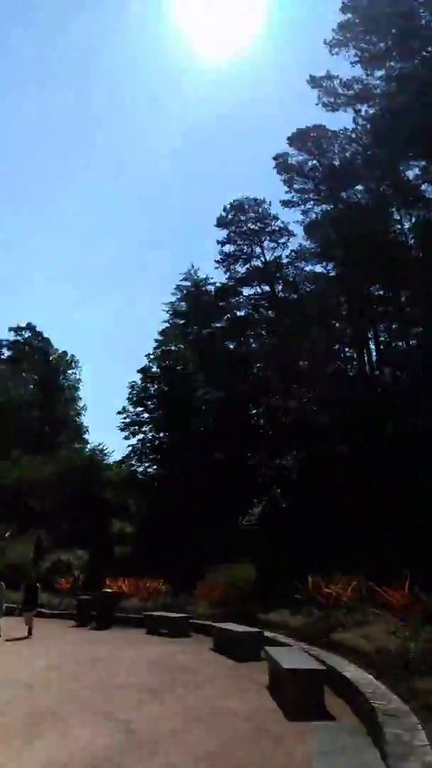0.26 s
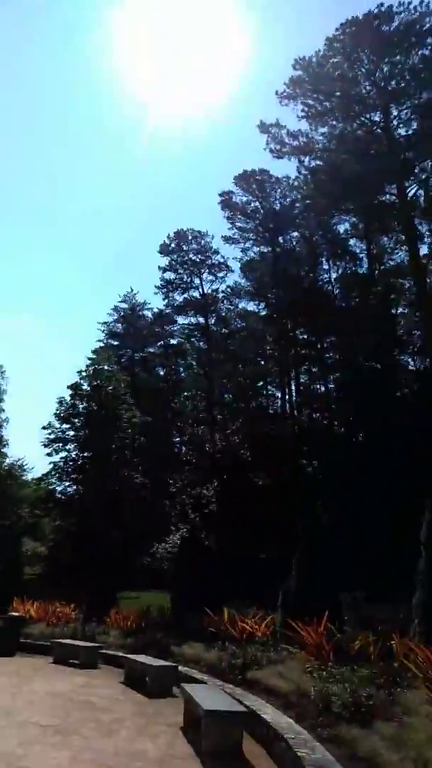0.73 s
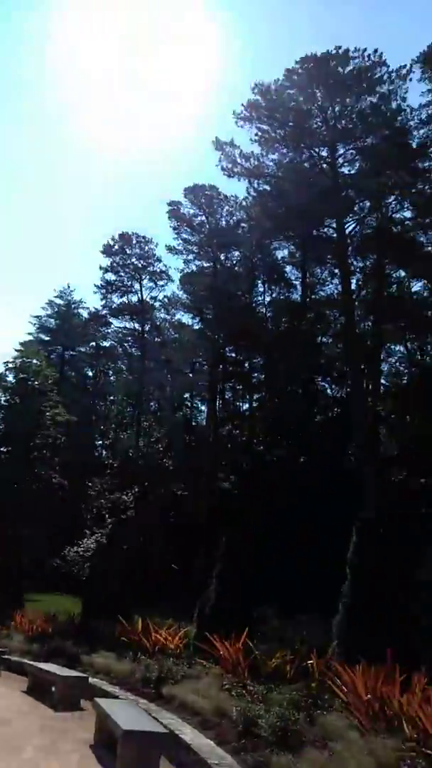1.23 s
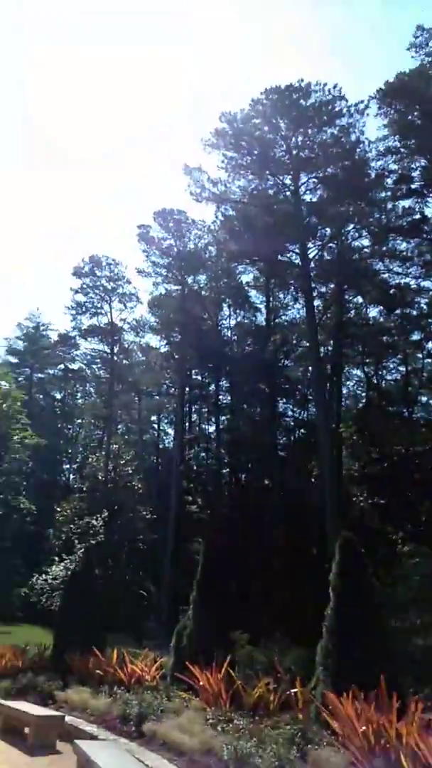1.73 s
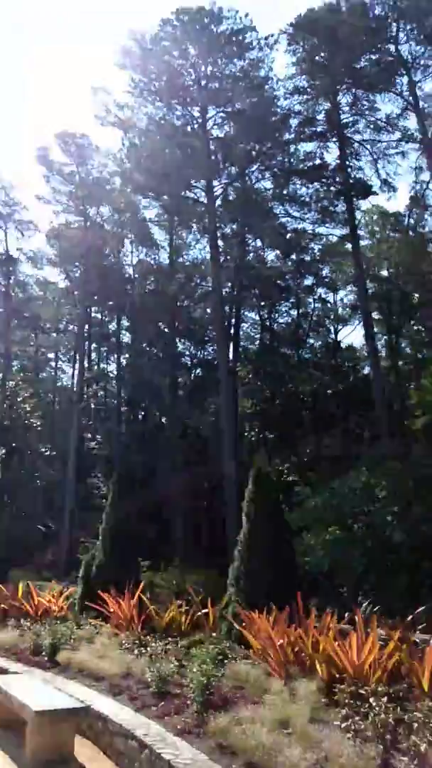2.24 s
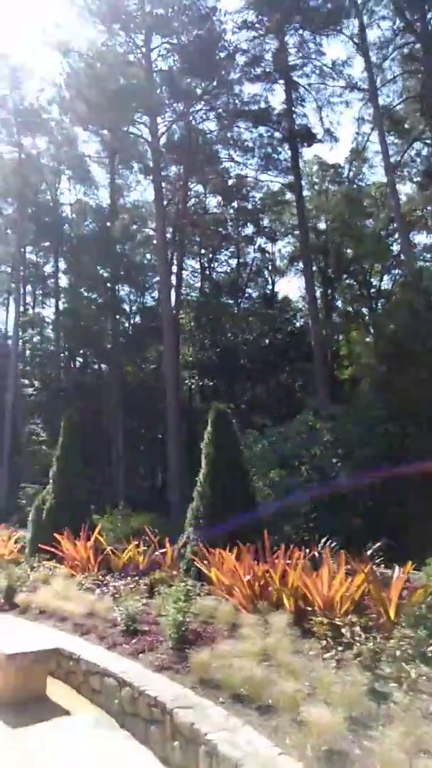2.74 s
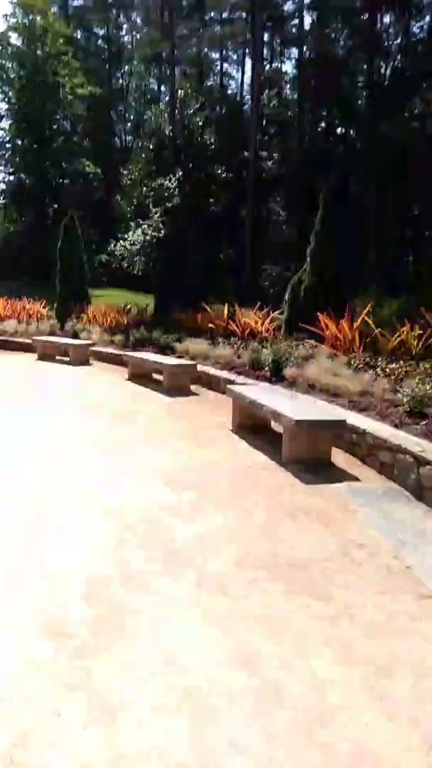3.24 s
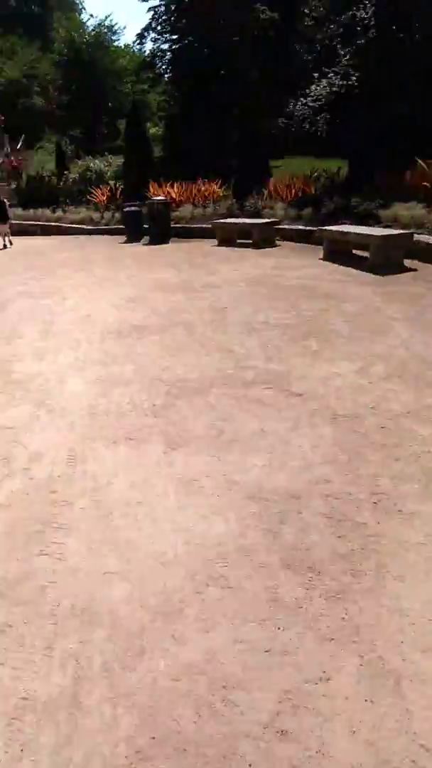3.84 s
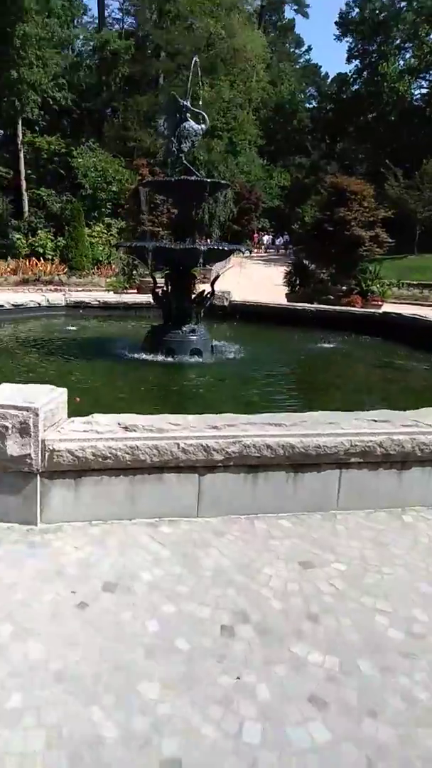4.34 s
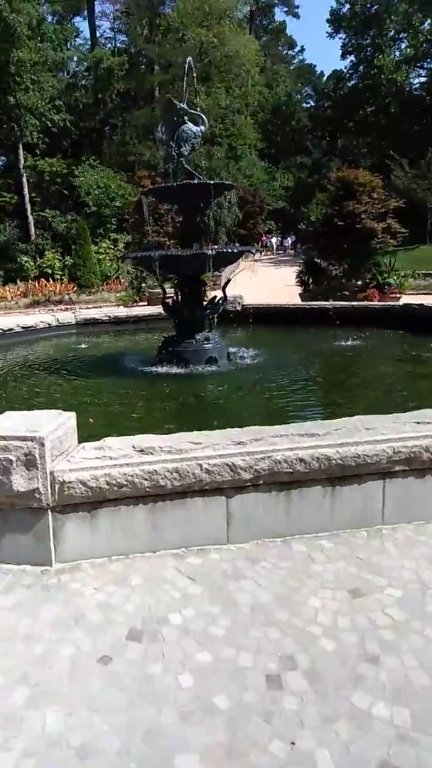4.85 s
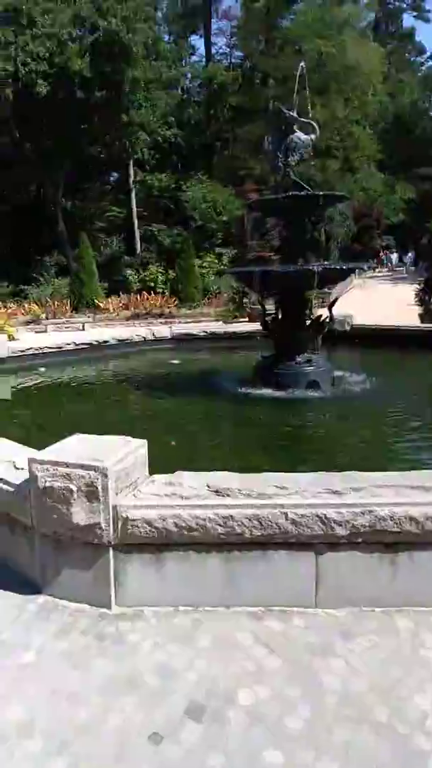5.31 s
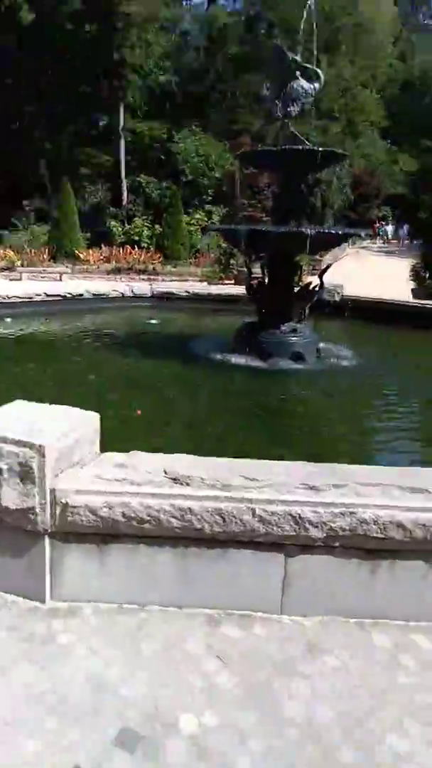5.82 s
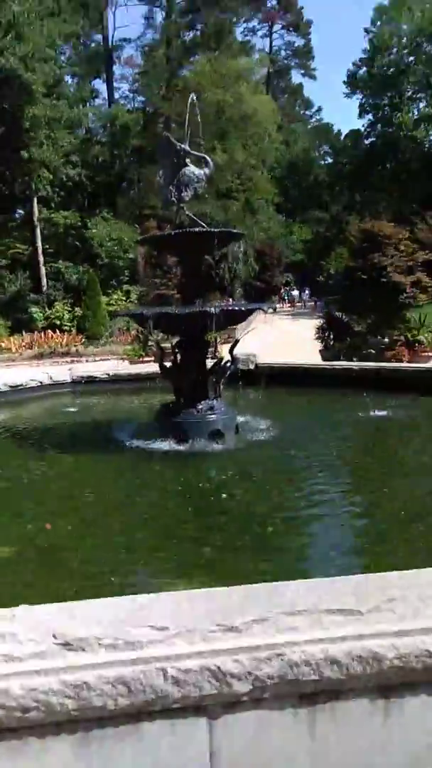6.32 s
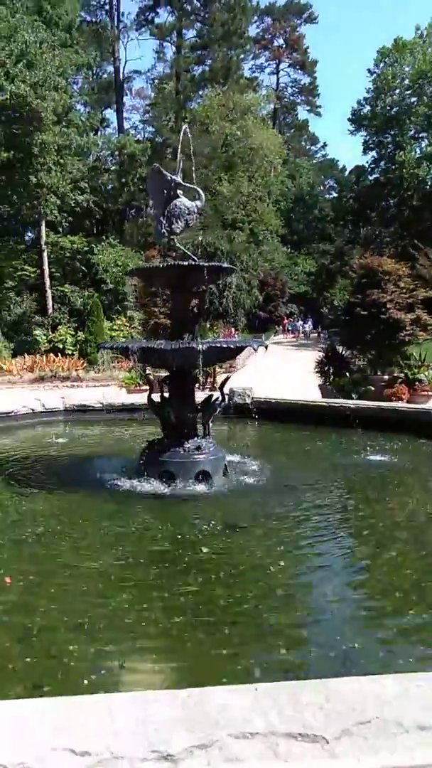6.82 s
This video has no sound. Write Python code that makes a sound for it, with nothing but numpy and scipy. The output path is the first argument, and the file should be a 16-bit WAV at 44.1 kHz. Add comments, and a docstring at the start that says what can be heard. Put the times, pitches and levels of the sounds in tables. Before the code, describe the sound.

Footsteps crunch along a gritty garden path, then a fountain splashes steadily into its pool, with one sharp click close by.

```python
"""Footsteps grind along a gritty garden path, over a soft hiss of leaves and water and a far rumble.
Short hollow knocks and plops pass left and right, and a faint whistle rasps on the right.
The walker then stands by a tiered fountain: sheets of water fizz, spray and bubble in its pool.
All is heard through the two microphone ports of a carried phone. The grit rings the left port
near 9 kHz, and late on a finger strikes the case beside that port."""
import sys
import numpy as np
from scipy import signal
from scipy.fft import rfft, irfft, next_fast_len
from scipy.io import wavfile
from scipy.ndimage import uniform_filter1d

SR = 44100
rng = np.random.default_rng(int(sys.argv[2]) if len(sys.argv) > 2 else 0)


def store_wav(level_fs):
    """Save 16-bit WAV to argv[1]."""
    pcm = np.round(np.clip(np.atleast_2d(level_fs), -1, 1) * 32767)
    wavfile.write(sys.argv[1], SR, pcm.T.astype(np.int16))


N = 311787
T = np.arange(N) / SR
FFT_SIZE = next_fast_len(N, True)
BIN_HZ = np.arange(FFT_SIZE // 2 + 1) * SR / FFT_SIZE
SIDES = np.array([[.5], [-.5]])  # splits a pan_db, always left minus right, between the ports


def undb(db):
    """Decibels to gain."""
    return 10 ** (np.asarray(db) / 20)


def along(curve, hz):
    """Read a (freq_hz, value) curve on a log-frequency axis."""
    return np.interp(np.log(hz + 1), np.log(np.array(curve)[:, 0]), np.array(curve)[:, 1])


def butter(sound, hz, kind, order=2):
    """Butterworth filter."""
    return signal.sosfilt(signal.butter(order, hz, kind, fs=SR, output="sos"), sound)


def add(out, start_s, sound, gains):
    """Mix a sound into both ports."""
    i = int(start_s * SR)
    sound = sound[:N - i]
    out[:, i:i + len(sound)] += np.reshape(gains, (2, 1)) * sound


def waver(rate_hz):
    """Smooth random drift with a spread near 1."""
    hold = int(SR / rate_hz)
    levels = np.repeat(rng.standard_normal(N // hold + 1), hold)
    return 1.3 * uniform_filter1d(uniform_filter1d(levels, hold), hold)[:N]


def swells(lifts):
    """Gain curve of bell-shaped lifts."""
    t = T[::64]
    lift_db = sum(db * np.exp(-((t - peak_s) / width_s) ** 2) for peak_s, db, width_s in lifts)
    return undb(np.interp(T, t, lift_db))


def grains(per_s, scatter_db, tail_s, bed):
    """Envelope of random particles with short tails over a steady bed."""
    hits = (rng.random(N) < per_s / SR) * 1.
    hits *= undb(scatter_db * np.minimum(rng.exponential(size=N // 8 + 1), 4)).repeat(8)[:N]
    env = signal.lfilter([1], [1, -np.exp(-1 / (tail_s * SR))], hits)
    return bed + env / np.sqrt(np.mean(env ** 2))


# How alike the ports sound, near mono in the bass and wide on top: freq_hz, likeness (0-1)
PORT_LIKENESS = [(60, 0.96), (130, 0.94), (290, 0.97), (640, 0.77), (1410, 0.58), (3100, 0.08),
                 (6820, 0.06), (15000, 0)]
def noise(eq, pan, env=1):
    """Stereo noise under an envelope, shaped and panned by band; its mono mix has rms 1."""
    mid, side = rfft((env * rng.standard_normal((2, N), np.float32)).astype(np.float32), FFT_SIZE)
    band = slice(int(eq[0][0] * FFT_SIZE / SR), int(eq[-1][0] * FFT_SIZE / SR))
    alike = along(PORT_LIKENESS, BIN_HZ[band])
    spectrum = np.zeros((2, len(BIN_HZ)), np.complex64)
    spectrum[:, band] = mid[band] * np.sqrt(1 + alike) + 2 * SIDES * side[band] * np.sqrt(1 - alike)
    spectrum[:, band] *= undb(along(eq, BIN_HZ[band]) + SIDES * along(pan, BIN_HZ[band]))
    out = irfft(spectrum, FFT_SIZE)[:, :N]
    return out / np.std(out.mean(axis=0))


def ring(hz, t60_s, rise_s, glide=0., softness=2):
    """A damped tone; softness rounds its attack and glide bends it upward."""
    t = np.arange(int((1.2 * t60_s + 3 * rise_s) * SR) + 8) / SR
    env = (1 - np.exp(-t / rise_s)) ** softness * np.exp(-np.log(1000) * t / t60_s)
    return env / env.max() * np.sin(2 * np.pi * hz * (t + glide * t ** 2 / t60_s))


def tread(start_s, level_db, rise_s, fade_s):
    """Pressure of a sole: a smooth rise, then a quickening fade, 20 dB down after fade_s."""
    t = T[::16] - start_s
    attack = np.sin(np.pi / 2 * np.clip(t / rise_s, 0, 1)) ** 1.2
    fade_db = 20 * np.clip((t - rise_s) / fade_s, 0, 4) ** 1.21
    return np.repeat(attack * undb(level_db - fade_db), 16)[:N]


# Stereo spread of the grit: freq_hz, pan_db
GRIT_SPREAD = [(60, 0.0), (110, -9), (200, -2), (380, -10), (700, -18), (1290, 13), (2380, 6), (4400, 0),
               (8120, 28), (15000, 55)]
# Steps and scuffs: start_s, fine_db, coarse_db, scrape_db, dust_db, fade_s
FOOTFALLS = [(-0.04, -35.5, -40, -49, -47, 0.09), (0.538, -36.5, -44, -49, -48, 0.05),
             (0.588, -49.5, -60, -64, -59, 0.17), (1.118, -43, -40.5, -47, -78, 0.01),
             (1.138, -43.5, -44, -50, -78, 0.026), (1.17, -54, -56, -50, -82, 0.05),
             (1.2, -50.5, -72, -64, -84, 0.31), (1.77, -86, -64.5, -81, -77, 0.4),
             (1.678, -41.5, -50, -53, -69, 0.095), (2.229, -59, -52.5, -59.5, -68, 0.3),
             (2.796, -39.5, -44.5, -47, -48, 0.11), (3.35, -51, -43, -54, -44.5, 0.1),
             (3.43, -46, -50.5, -59, -51, 0.2), (3.675, -51, -46.5, -64, -46.5, 0.05),
             (3.96, -47.5, -60, -53, -66, 0.05), (5.293, -44, -51.5, -50, -62, 0.11),
             (5.5, -50, -64, -62, -66, 0.1)]
HARD_GROUND_S, HARD_PITCH_RATIO = 3.2, 1.25  # on harder ground the coarse grit bites higher
def footsteps():
    """Soles grind grit: coarse stones bite first, then fine grit, dust and scrape swell with the roll."""
    fine_env = coarse_env = scrape_env = dust_env = 0
    for start_s, fine_db, coarse_db, scrape_db, dust_db, fade_s in FOOTFALLS:
        coarse_env += tread(start_s - 0.0022, coarse_db, 0.019, 0.76 * fade_s)
        fine_env += tread(start_s, fine_db, 0.033, fade_s)
        scrape_env += tread(start_s, scrape_db, 0.033, 0.88 * fade_s)
        dust_env += tread(start_s, dust_db, 0.033, 0.88 * fade_s)
    stones = grains(per_s=450, scatter_db=2.0, tail_s=0.0027, bed=0.65)
    sand = grains(per_s=800, scatter_db=2.1, tail_s=0.0009, bed=0.45)
    loose_eq = [(700, -22.5), (1200, -9.5), (2050, -0.5), (2700, -2), (3500, -10.5), (5500, -16.5),
                (7000, -30), (8000, -37)]
    hard_eq = [(hz * HARD_PITCH_RATIO, db) for hz, db in loose_eq]
    port_eq = [(6500, -27), (7400, -2), (8600, 7), (9600, 0.5), (10800, -37), (11500, -51)]
    dust_eq = [(9000, -25), (10200, 11), (11400, 4), (12600, -7), (16500, -21)]
    scrape_eq = [(3200, -13), (4200, -4.5), (5000, -10.5), (5600, 0), (6200, -8), (7600, -11),
                 (8200, 3.5)]
    loose = noise(loose_eq, GRIT_SPREAD, stones)
    hard = noise(hard_eq, GRIT_SPREAD, stones)
    coarse = np.where(T < HARD_GROUND_S, loose, hard)
    fine = noise(port_eq, GRIT_SPREAD, sand)  # fine grit sits in the port resonance
    dust = noise(dust_eq, GRIT_SPREAD, sand + 1.8)
    scrape = noise(scrape_eq, [(5500, 2.4)], sand + 4.3)
    return scrape_env * scrape + coarse_env * coarse + fine_env * fine + dust_env * dust


def bubbles(count, start_s, low_hz, span_ratio, cycles):
    """A crowd of small bubbles leaning right; each rings briefly and glides up."""
    out = np.zeros((2, N))
    for when, pitch, faintness, side in rng.random((count, 4)):
        hz = low_hz * span_ratio ** pitch
        gains = undb(-14 * faintness + 11.6 * (side - 1) * SIDES)
        add(out, start_s + when * (T[-1] - start_s), ring(hz, cycles / hz, 1.64 / hz, glide=0.34), gains)
    return out


# Tone of the garden hiss: freq_hz, gain_db
HISS_EQ = [(76, -7), (130, -3), (243, -2.5), (500, -8.5), (780, -8.5), (1400, -5), (2670, -4.5), (4070, -9),
           (5500, -4), (6870, -10), (8920, 0.5), (10300, -7.5), (11500, -16.5), (16500, -20)]
# Its stereo spread: freq_hz, pan_db
HISS_SPREAD = [(60, -10), (110, -5), (200, -4.5), (380, -1.5), (700, -1.5), (1290, 3), (2380, -1),
               (4400, -2.5), (8120, 2), (15000, 6)]
# Its level and pan as the phone turns: time_s, gain_db, pan_db
PHONE_TURN = [(0, 1, 1.5), (1.9, 0.5, 1.5), (2.1, 2.5, 3), (2.8, 1.5, 3), (3.0, 1.5, -0.5),
              (3.3, 0.5, -1.5), (3.5, 4, 10)]
def garden():
    """Leaves and far water hiss and gurgle softly; lows, mids and highs waver separately."""
    hiss = 0
    for low_hz, top_hz, band_db in [(70, 1000, -9.5), (993, 6600, -5.0), (6700, 16500, -3.5)]:
        inner_hz = [hz for hz, _ in HISS_EQ if low_hz < hz < top_hz]
        eq = [(hz, along(HISS_EQ, hz)) for hz in [low_hz, *inner_hz, top_hz]]
        rustle = grains(per_s=500, scatter_db=7.6, tail_s=0.013, bed=1.3) * undb(1.07 * waver(4.5))
        hiss += undb(band_db) * noise(eq, HISS_SPREAD, rustle)
    time_s, gain_db, pan_db = np.transpose(PHONE_TURN)
    hiss *= undb(np.interp(T, time_s, gain_db) + SIDES * np.interp(T, time_s, pan_db))
    gurgle = undb(-2) * bubbles(count=260, start_s=0, low_hz=354.7, span_ratio=7.8, cycles=42.6)
    return undb(-57.5) * (hiss + gurgle)


# Tone of the rumble: freq_hz, gain_db
RUMBLE_EQ = [(15, -56), (25, -15), (48, -13), (65, 0), (150, -22), (200, -46), (330, -120)]
# Soft thuds in it: peak_s, lift_db, width_s
RUMBLE_THUDS = [(0.53, 7, 0.049), (0.79, 10, .06), (1.11, 12, 0.028), (1.62, 9.5, 0.066), (2.61, 7, .03),
                (2.86, 10, 0.026), (3.06, 7, 0.035), (4.02, 7, .03), (4.57, 6, 0.081), (5.0, 13, 0.023),
                (5.96, 10, 0.073), (6.45, 5, 0.036), (6.9, 5.5, 0.04)]
def rumble():
    """A far rumble wavers and swells into soft low thuds."""
    return noise(RUMBLE_EQ, [(60, 0.4)]) * undb(-65.5 + 2 * waver(8)) * swells(RUMBLE_THUDS)


def puff(hz, t60_s, white):
    """The rough burst around a plop: decaying noise about two octaves wide."""
    t = np.arange(len(white)) / SR
    band = butter(white, [hz / 1.73, hz * 2.65], "band")
    return band / band.std() * (1 - np.exp(-t / 0.0029)) * undb(-60 * t / t60_s)


# Hollow knocks and plops: time_s, level_db, pitch_hz, pan_db, t60_s, crack_db (against the ring)
PLOP_HITS = [(0.387, -65, 358, 1, 0.039, -10), (0.71, -61, 885, 5, .06, -17),
             (0.791, -59, 1046, 0, .05, -15), (1.046, -55.5, 478, 2.5, 0.045, -17),
             (1.305, -58.5, 603, -2, .04, 3), (1.388, -58.5, 940, -3, 0.065, -4),
             (1.785, -60, 486, 0, 0.066, -17.5), (2.08, -56.5, 1440, 2, 0.084, -15),
             (2.151, -62, 514, -4, 0.044, -11), (2.286, -54, 480, -5, .08, -17),
             (2.378, -55, 606, 9, 0.033, -12), (2.45, -52, 1330, 3, .05, -15),
             (2.59, -60, 460, 1, 0.077, -15), (2.615, -60, 523, 4, 0.046, -15),
             (2.957, -52, 1330, 12, .03, -21.5), (2.96, -54, 497, 4, .03, -9),
             (2.975, -53, 1370, 8, .03, -22), (2.988, -51, 910, 12, 0.037, -10.5),
             (5.378, -45.5, 304, 9, 0.14, -6), (2.327, -51.5, 541, 13, 0.034, -6),
             (2.359, -57.5, 496, 8, 0.036, 1), (2.7752, -46, 613, -19, 0.013, -1.5),
             (2.995, -41, 328, 11, 0.017, -3.5), (3.041, -53.5, 500, 9, 0.053, -10),
             (3.55, -46.5, 850, 25, 0.0075, -8), (4.0, -38, 634, -17, 0.021, -19),
             (4.026, -47, 456, -30, 0.02, -16), (4.047, -47, 656, -14, 0.059, -5),
             (4.197, -44, 307, -18, 0.03, -23), (4.535, -50.5, 550, 5, 0.039, -8),
             (4.588, -37.5, 540, -25, 0.014, -27), (4.645, -50.5, 388, -20, 0.03, -3.5),
             (4.731, -46, 434, -17, 0.016, -20), (4.93, -46.5, 390, 5, 0.091, -18),
             (5.127, -42.5, 920, -10, 0.033, -9), (5.189, -47.5, 245, -14, 0.024, -14),
             (5.579, -45.5, 518, 22.5, 0.023, 5.5), (5.747, -48, 370, 2, 0.058, -7),
             (5.848, -46, 567, 3, 0.051, -9), (5.95, -45, 1004, 10, 0.062, -14),
             (6.033, -49.5, 370, 0, 0.091, -15), (6.417, -45, 380, 3, 0.067, -2),
             (6.449, -41.5, 786, 9, 0.051, -1), (6.773, -41, 318, 2, 0.043, -19),
             (7.011, -45, 480, -6, 0.045, -5)]
PUFF_DB, REBOUND_RATIO = -5.5, 0.72  # puff against the ring; each rebound against the one before
def plops():
    """Knocks and plops swell, ring hollow and rebound four times unevenly, with a dry crack."""
    out = np.zeros((2, N))
    rebounds = rng.random((len(PLOP_HITS), 2, 4))
    whites = rng.standard_normal((len(PLOP_HITS), SR // 8))
    for (time_s, db, hz, pan_db, t60_s, crack_db), chance, white in zip(PLOP_HITS, rebounds, whites):
        gains = undb(db + pan_db * SIDES)
        add(out, time_s - 0.57 / hz, ring(hz, t60_s, 0.99 / hz), gains)
        add(out, time_s - .002, puff(hz, 1.53 * max(t60_s, .03), white), undb(PUFF_DB) * gains)
        for k, (gap, detune) in enumerate(chance.T, 1):
            rebound = ring(hz * (0.743 + 0.452 * detune), 0.42 * t60_s, 0.91 / hz)
            add(out, time_s + .006 * (k + gap), rebound, REBOUND_RATIO ** k * gains)
        # the crack: two quickly damped overtones
        add(out, time_s + 0.0014, ring(1.6 * hz, 0.01, 0.00081), undb(crack_db) * gains)
        add(out, time_s + 0.00152, ring(2.58 * hz, 0.0078, 0.001), undb(crack_db) * gains)
    return out


# Sharp accents in the steps: start_s, left_db
STONE_CRACKS = [(0.5602, -28), (0.57, -21), (0.5736, -26), (0.5774, -16), (0.6212, -30), (1.142, -37),
                (1.1554, -34), (1.1654, -32), (1.1964, -37), (2.839, -26), (2.8495, -32), (3.3727, -31)]
def stone_cracks():
    """Single stones crack under the sole and ping the left port's resonance."""
    out = np.zeros((2, N))
    ping = ring(hz=8540, t60_s=0.0022, rise_s=0.00022, softness=1)
    for start_s, left_db in STONE_CRACKS:
        add(out, start_s, ping, undb([left_db, left_db - 30]))
    return out


# Two overlapping rasps: start_s, end_s, pitch_hz, width_hz, level_db
WHISTLE_BANDS = [(1.458, 1.717, 4350, 300, -59), (1.47, 1.89, 5480, 600, -62)]
def whistle():
    """A faint rough whistle on the right, perhaps an insect: narrow bands of hiss swell and fade."""
    out = 0
    for start_s, end_s, hz, width_hz, db in WHISTLE_BANDS:
        eq = [(hz + k * width_hz, edge_db) for k, edge_db in
              [(-3, -40), (-1, -6), (0, 0), (1, -6), (3, -40)]]
        rasp = grains(per_s=170, scatter_db=2.5, tail_s=0.013, bed=1.0)
        fade = np.clip(np.minimum(T - start_s, end_s - T) / 0.045, 0, 1)
        out += undb(db) * fade * noise(eq, [(hz, -6)], rasp)
    return out


# Single bright drops: time_s, level_db, pitch_hz, pan_db
DROP_HITS = [(2.9836, -44.5, 5370, -21), (3.4487, -41, 1700, 11), (3.484, -37, 2200, 5),
             (3.635, -43.5, 1730, 3), (3.6711, -35.5, 1640, -20.5), (4.115, -40, 2480, -4),
             (4.3625, -49, 1450, -8), (4.515, -39.5, 2580, -7), (4.887, -36.5, 2140, 5.5),
             (5.2687, -38, 3420, -2), (5.317, -44, 2920, 2), (5.95, -42.5, 1840, 17),
             (6.0262, -41, 1900, 16), (6.1898, -43, 1880, 3.5), (6.43, -44, 1780, -4),
             (6.773, -44, 2000, -5), (6.8938, -39, 1470, -2)]
def drops():
    """Each drop rings with a slight upward glide and rebounds once, softer and detuned."""
    out = np.zeros((2, N))
    for time_s, db, hz, pan_db in DROP_HITS:
        gap, detune = rng.random(2)
        gains = undb(db + pan_db * SIDES)
        add(out, time_s - 1.5 / hz, ring(hz, 24 / hz, 1.9 / hz, glide=0.042), gains)
        rebound = ring(hz * (0.83 + 0.295 * detune), 30 / hz, 3 / hz, glide=0.04)
        add(out, time_s + 0.0039 + .008 * gap, rebound, undb(-3) * gains)
    return out


# Tone of the splash: freq_hz, gain_db
SPLASH_EQ = [(90, -40), (150, -14), (350, -3.5), (500, -7), (740, -4.5), (1000, -8.5), (1300, -3.5),
             (1800, 0), (2500, -3.5), (3400, -1.5), (4800, -4), (5800, -10.5), (9000, -13)]
# Its stereo spread: freq_hz, pan_db
SPLASH_SPREAD = [(60, 1.5), (110, -12.5), (200, -7), (380, 0), (700, 3), (1290, -2), (1750, 1.5),
                 (2380, -3.5), (3700, -3), (4600, -7), (8120, 6), (15000, 5)]
def pool_splash(start_s):
    """Water hits the pool: bubbles from start_s, over fizz whose half-octaves each crackle and swell."""
    out = undb(-4) * bubbles(count=900, start_s=start_s, low_hz=745.5, span_ratio=6.46, cycles=35)
    for hz in 300 * 2 ** np.arange(-.5, 4.6, .5):
        window = [(hz / 1.55, -24), (hz / 1.15, -1), (hz, 0), (hz * 1.15, -1), (hz * 1.55, -24)]
        eq = [(freq_hz, along(SPLASH_EQ, freq_hz) + edge_db) for freq_hz, edge_db in window]
        crackle = grains(per_s=hz / 3, scatter_db=0.43, tail_s=8 / hz, bed=0.77)
        clumps = grains(per_s=40, scatter_db=1.5, tail_s=0.013, bed=1.8)
        swell = undb(0.52 * waver(3.64))
        gain = undb(along(SPLASH_EQ, hz) - 11) * np.sqrt(hz / 1800)
        out += gain * noise(eq, SPLASH_SPREAD, crackle * clumps * swell)
    return out


# Delay off the stone rim, shifting as the walker nears: time_s, lag_ms
RIM_LAG = [(3.36, 1.1), (4.4, 1.2), (4.6, 0.95), (5.5, 0.83), (5.7, 1.05), (6.3, 1.02), (6.6, 1.02),
           (7.07, 1.22)]
RIM_GAINS, RIM_TOP_HZ = [0.81, 0.099], 3460  # gains at the left and right port
def rim_reflection(splash):
    """The splash bounces off the stone rim and arrives late and dull, mostly on the left."""
    samples = np.arange(N)
    late = samples - np.interp(T, *np.transpose(RIM_LAG)) * SR / 1000
    dull = butter(splash, RIM_TOP_HZ, "low")
    return np.array([gain * np.interp(late, samples, port) for gain, port in zip(RIM_GAINS, dull)])


# Tone of the spray: freq_hz, gain_db
SPRAY_EQ = [(4000, -53), (6000, -4.5), (7200, 0.5), (9000, 2), (10500, -2.5), (12000, -9.5), (16000, -10.5)]
# Its stereo spread: freq_hz, pan_db
SPRAY_SPREAD = [(7500, -3), (8600, -2.5), (10000, 7), (14000, -6.5)]
# Gushes that lift the splash: peak_s, lift_db, width_s
SPLASH_GUSHES = [(3.68, 3.5, 0.042), (4.04, 6, 0.052), (4.16, 3.5, 0.059), (4.52, 3, 0.018),
                 (4.9, 2.5, 0.025), (5.07, 1, 0.016), (6.03, 0, 0.031), (6.2, 3, 0.019), (6.43, 3, 0.036),
                 (6.9, 1.5, 0.051)]
# Fader moves on the fountain: time_s, master_db, treble_lift_db, spray_gain_db, spray_pan_db
FOUNTAIN_MIX = [(3.36, -56, 2, 10, 17), (3.55, -46.5, 5, -6.5, 5), (3.9, -49, 1, -4, 6),
                (4.4, -49.5, 2.5, -3.5, 7), (4.8, -48, 2.5, -2.5, 5.5), (5.2, -47, 0, -3, 3.5),
                (5.5, -45.5, -2.5, -4.5, 6.5), (6.0, -47, 1, -2, 10.5), (6.5, -47, -1, -1, 9.5),
                (7.07, -46.5, 0, -1, 9)]
def fountain():
    """Sheets of water gush into the pool under a bright spray; the rim doubles the splash."""
    time_s, *faders = np.transpose(FOUNTAIN_MIX)
    master_db, treble_db, spray_db, pan_db = (np.interp(T, time_s, fader) for fader in faders)
    splash = pool_splash(time_s[0])
    splash += butter(splash, 2200, "high") * (undb(treble_db) - 1)
    splash += rim_reflection(splash)
    droplets = grains(per_s=800, scatter_db=2.4, tail_s=0.0025, bed=0.82)
    spray = noise(SPRAY_EQ, SPRAY_SPREAD, droplets) * undb(spray_db - 4 + SIDES * pan_db)
    fade_in = np.clip((T - time_s[0]) / 0.03, 0, 1)
    return fade_in * undb(master_db) * (swells(SPLASH_GUSHES) * splash + spray)


# Ringing modes of the phone case: pitch_hz, left_db, right_db, t60_s
CASE_MODES = [(55, -23, -42, .056), (350, -40, -21, .04), (582, -10.5, -32, .014), (670, -5, -32, .0084),
              (1006, -7.5, -34, .0067), (1500, -24, -48, .03), (2624, -14, -50, .005)]
# The nail's tick, a few cycles a band: pitch_hz, left_db
NAIL_TICK = [(1900, -24), (3600, -25), (5300, -26), (8600, -31)]
BLOW_S, BLOW_RISE_S, FAR_LAG_S = 5.41253, .0036, .002
TICK_S, TICK_CYCLES, RATTLE_T60_S = 5.4146, 11, 0.24
BEND_PEAK_S, BEND_HZ, BEND_LENGTH_S = 5.41707, 144, .0142
def finger_strike():
    """The case bends in, ticks, rings and rattles out; the right port hears the ring late and faint."""
    out = np.zeros((2, N))
    t = np.arange(-BEND_LENGTH_S / 2, BEND_LENGTH_S / 2, 1 / SR)
    bend = -np.cos(2 * np.pi * BEND_HZ * t) * np.cos(np.pi * t / BEND_LENGTH_S) ** 2
    add(out, BEND_PEAK_S - BEND_LENGTH_S / 2, bend, undb([-7.8, -32]))
    for hz, left_db, right_db, t60_s in CASE_MODES:
        add(out, BLOW_S, ring(hz, t60_s, BLOW_RISE_S, softness=4), [undb(left_db), 0])
        add(out, BLOW_S + FAR_LAG_S, ring(hz, t60_s, BLOW_RISE_S), [0, undb(right_db)])
    for hz, left_db in NAIL_TICK:
        add(out, TICK_S, ring(hz, TICK_CYCLES / hz, 1 / hz, softness=1), [undb(left_db), 0])
    rough = butter(rng.standard_normal(SR // 4), [450, 3600], "band", order=3)
    rattle = rough / rough.std() * undb(-60 * T[:SR // 4] / RATTLE_T60_S)
    add(out, BLOW_S + FAR_LAG_S, rattle, undb([-29.5, -47]))
    return out


def scene():
    """Steps, water and the finger strike up front, the garden behind."""
    foreground = footsteps() + stone_cracks() + fountain() + plops() + drops() + finger_strike()
    return foreground + whistle() + garden() + rumble()


LOW_CUT_HZ, HIGH_CUT_HZ = 33.3, 15900
def record(dry):
    """The phone thins the deepest bass and cuts the top."""
    thin = butter(dry, LOW_CUT_HZ, "high")
    return signal.sosfilt(signal.ellip(10, .2, 80, HIGH_CUT_HZ, fs=SR, output="sos"), thin)


dry = scene()
out = record(dry)
store_wav(out)
```